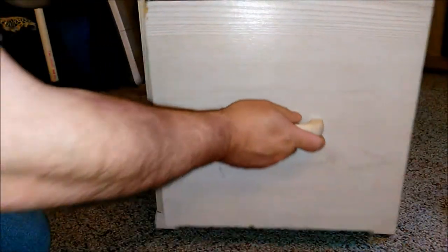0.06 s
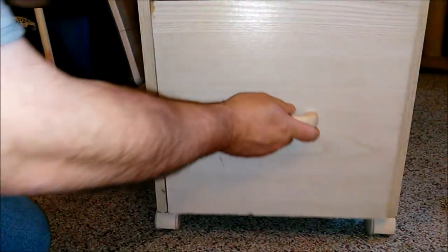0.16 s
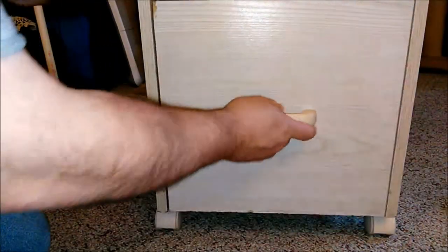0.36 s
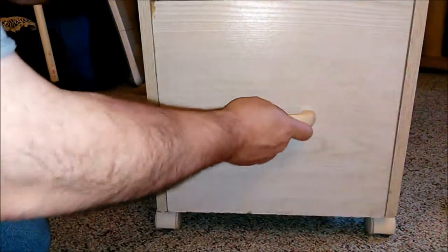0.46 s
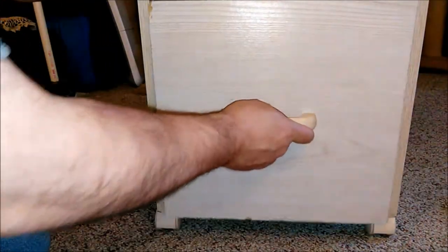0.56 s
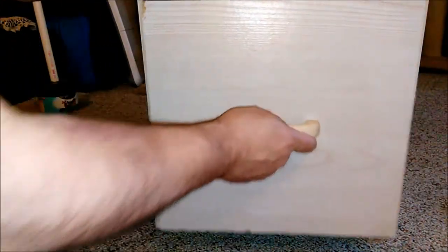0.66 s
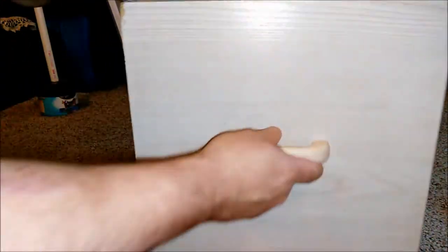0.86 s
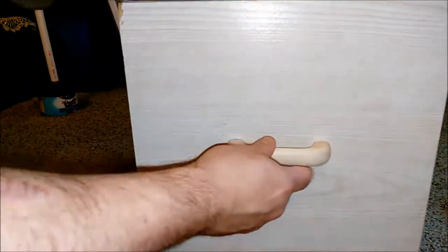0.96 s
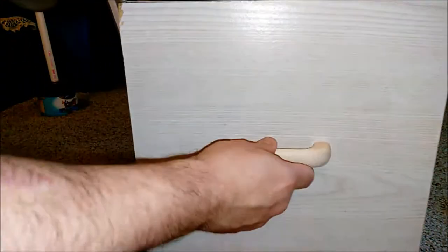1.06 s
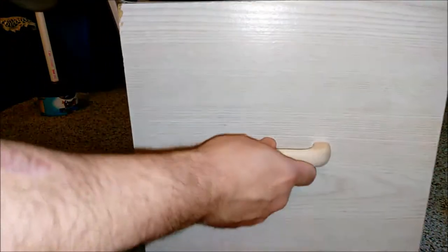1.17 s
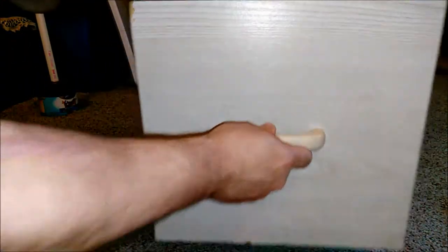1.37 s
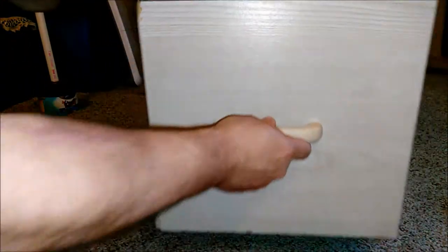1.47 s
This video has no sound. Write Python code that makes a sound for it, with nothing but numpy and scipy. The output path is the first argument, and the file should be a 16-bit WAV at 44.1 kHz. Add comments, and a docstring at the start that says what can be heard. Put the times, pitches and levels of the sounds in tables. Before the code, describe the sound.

Close to the microphone in a carpeted room, a wooden drawer bangs shut and rattles against its cabinet. It then slides open with a light rumble and hollow knocks, rests briefly and begins to slide once more.

```python
"""In a carpeted room, close by, a chipboard drawer glides in and slams, rattling against its cabinet.
It is tugged free, rolls out with a soft hiss and hollow bumps, rests, then starts to move again.
Each impact excites damped modes: the hollow drawer and the cabinet boom, the panels clatter and crack.
Friction makes the runners hiss and the rollers chirp; the rollers rumble with the load they bear."""
import sys
import numpy as np
from scipy import signal
from scipy.fft import rfft, irfft, next_fast_len
from scipy.io import wavfile
from scipy.ndimage import map_coordinates

SR = 44100
rng = np.random.default_rng(int(sys.argv[2]) if len(sys.argv) > 2 else 0)


def transcribe(u):
    """Save the signal u as a 16-bit wav file named by the first command-line argument.

    u: samples, shape (n,) or (channels, n), limited to [-1, 1]; the rate is SR.
    q: integer samples, one column per channel.
    """
    v = np.clip(np.atleast_2d(u).T, -1, 1)
    q = np.round(v * 32767).astype(np.int16)
    wavfile.write(sys.argv[1], SR, q)


N = 66150

# impacts of the drawer on its cabinet: start_s, boom_hz, boom_db, boom_t60_s, panel_db, crack_db
IMPACTS = [(0.072, 138.2, -22.5, 0.14, -44, -42), (.203, 220, -23, 0.022, -15, -29.5),
           (0.212, 159.5, -3.5, 0.11, -42.5, -27), (0.2415, 179.9, -9.5, 0.24, -15, -49),
           (.269, 175, -29, 0.034, -18.5, -53), (.281, 151.6, -5.5, 0.11, -38.5, -48),
           (.355, 170, -43.5, 0.068, -66, -60.5), (0.402, 147, -52, 0.053, -55.5, -60),
           (0.45, 148, -39, 0.13, -55, -80), (0.509, 155.9, -13, 0.16, -47, -63.5),
           (0.534, 171, -17, 0.094, -64, -80), (0.733, 178, -38, 0.084, -67, -80),
           (.865, 189, -19, 0.065, -57.5, -61), (1.041, 181.8, -31, 0.11, -62.5, -77),
           (1.100, 170, -42.5, 0.16, -73, -74.5), (1.257, 198, -25.5, 0.051, -58, -86.5),
           (1.312, 161.7, -28, 0.077, -68.5, -105.5), (1.373, 179.6, -33, 0.079, -61, -64.5)]
CRACK_RISE_S = 0.0007  # onset of cracks, ticks and grit


def amp(db):
    """Amplitude ratio of a level in decibels."""
    return 10 ** (np.asarray(db) / 20)


def unit(x):
    """Normalisation to an rms of 1."""
    return x / np.sqrt(np.mean(x ** 2) + 1e-20)


def along(points, hz):
    """Interpolation of (frequency, value) points on a logarithmic frequency axis."""
    frequencies, values = np.transpose(points)
    return np.interp(np.log(hz + 1), np.log(frequencies + 1), values)


def since(start_s):
    """Time elapsed from an onset in seconds, zero before it."""
    return np.maximum(np.arange(N) / SR - start_s, 0)


def struck(t, rise_s, t60_s):
    """Envelope of a damped vibration: a rounded rise and an exponential decay."""
    return (1 - np.exp(-(t / rise_s) ** 2)) * np.exp(-np.log(1000) * t / t60_s)


def mode(t, hz, rise_s, t60_s):
    """Free vibration of one mode: a damped sinusoid."""
    return struck(t, rise_s, t60_s) * np.sin(2 * np.pi * hz * t)


def add(track, start_s, sound):
    """Superposition of a sound on a track from a given onset."""
    part = track[..., round(start_s * SR):][..., :sound.shape[-1]]
    part += sound[..., :part.shape[-1]]


def filtered(x, response):
    """Linear filtering: the spectrum is multiplied by a frequency response."""
    size = next_fast_len(N + SR // 4)
    return irfft(rfft(x, size) * response(np.fft.rfftfreq(size, 1 / SR)), size)[..., :N]


def stereo_angle(hz):
    """Coherence as a mid-side angle in radians: the channels agree in the bass and part in the treble."""
    # likeness of left and right: frequency_hz, correlation
    coherence = [(100, 1), (250, .95), (500, .8), (1000, 0.44), (2000, -.1), (12000, 0)]
    return np.arccos(np.clip(along(coherence, hz), -1, 1)) / 2


def noise(spectrum):
    """Partially coherent stereo noise of rms 1, coloured by a spectrum."""
    def response(hz):
        angle = stereo_angle(hz)
        return amp(along(spectrum, hz)) * [np.cos(angle), np.sin(angle)]
    mid, side = filtered(rng.standard_normal((2, N)), response)
    return unit(np.array([mid + side, mid - side]))


def bursts(spectrum, events, rise_s, t60_s):
    """Incoherent addition: decaying noise bursts, one per (start_s, level_db), sum in power."""
    power = sum((amp(db) * struck(since(start_s), rise_s, t60_s)) ** 2 for start_s, db in events)
    return noise(spectrum) * np.sqrt(power)


def background():
    """Stationary noise, faint and strongest in the deep bass."""
    # background spectrum: frequency_hz, relative_density_db
    floor_spectrum = [(25, 15), (130, 0), (300, -7.5), (900, -14.5), (2000, -34), (9000, -17.5),
                      (15000, -22.5)]
    return amp(-67) * noise(floor_spectrum)


def reverberation(x, delay_s=0.012):
    """Convolution with the room's short impulse response, in which each band decays at its own rate."""
    # reverberation time: frequency_hz, t60_s
    decay_times = [(100, 0.24), (300, 0.36), (1000, 0.13), (3000, .3), (10000, 0.13)]
    white = noise([(100, 0), (10000, 0)])[:, :SR // 2]
    hz, t, bands = signal.stft(white, SR, nperseg=256)
    decay = amp(-60 * t / along(decay_times, hz)[:, None])
    _, tail = signal.istft(bands * decay, SR, nperseg=256)
    tail = np.pad(tail / np.linalg.norm(tail[0]), ((0, 0), (round(delay_s * SR), 0)))
    return signal.fftconvolve(x, tail, axes=1)[:, :N]


def roller_chirps(waver_hz=6, knots_per_s=150):
    """Friction-excited vibration: a rubbing roller sings briefly on an unsteady note."""
    # chirps of the rollers: start_s, pitch_hz, level_db, length_s
    chirp_events = [(0.072, 1365, -44, 0.022), (0.057, 1602, -48.5, 0.05), (0.067, 1050, -47, .026),
                    (0.74, 745, -49.5, 0.029), (0.998, 795, -52, 0.016), (1.242, 827, -65, 0.021),
                    (1.34, 1005, -60.5, .06), (1.357, 549, -63, 0.055)]
    out, position = np.zeros(N), np.arange(N) * knots_per_s / SR
    for start_s, hz, db, length_s in chirp_events:
        waver = map_coordinates(rng.standard_normal(2048), [position], mode="wrap")
        phase = 2 * np.pi * np.cumsum(hz + waver_hz * waver) / SR
        envelope = np.sin(np.pi * np.minimum(since(start_s) / length_s, 1)) ** 2
        out += amp(db) * envelope * np.sin(phase)
    return out


def runners(specks_per_s=120, speck_spread_db=3.5, grit_db=-10):
    """Sliding and rolling contact: gritty hiss follows speed, rumble follows load; the runners tick."""
    # the drawer's speed, as the level of its hiss: time_s, level_db
    speed_curve = [(0, -55.5), (0.069, -51), (.12, -52), (.185, -52.5), (.25, -54.5), (0.421, -77.5),
                   (0.499, -78), (.56, -64.5), (.66, -60.5), (.76, -53), (.85, -55.5), (.93, -65.5),
                   (1.04, -67), (1.14, -78), (1.27, -79.5), (1.341, -68.5), (1.419, -57.5), (1.5, -56)]
    # load on the rollers, as the level of their rumble: time_s, level_db
    load_curve = [(0, -55), (0.056, -44), (0.128, -41), (.19, -56.5), (0.451, -60), (.6, -63), (.7, -49),
                  (0.791, -42.5), (.85, -52), (.93, -47.5), (1.02, -53.5), (1.12, -57), (1.2, -83),
                  (1.27, -62), (1.36, -57), (1.5, -61.5)]
    # rubbing of the runners: frequency_hz, relative_density_db
    hiss_spectrum = [(200, -10), (550, -13.5), (780, 3.5), (900, 2.5), (1050, 10), (1300, -2), (1650, 1.5),
                     (2200, 4), (3000, 3), (3900, -4), (5200, -9.5), (7400, -2), (11000, -10.5),
                     (15000, -21.5)]
    # rumble of the rollers: frequency_hz, relative_density_db
    rumble_spectrum = [(30, -31), (65, -23.5), (100, -18), (130, 2.5), (170, 6.5), (215, 1), (280, -18),
                       (450, -30), (1000, -64)]
    # small ticks of the runners: start_s, level_db
    tick_events = [(0.062, -48.5), (.071, -49), (0.142, -48.5), (0.342, -65), (0.698, -51), (.877, -54),
                   (0.951, -52.5), (0.978, -60)]
    # colour of a tick: frequency_hz, relative_density_db
    tick_spectrum = [(1000, -39.5), (2800, 4.5), (4800, -9.5), (7000, 4.5), (10000, -7.5), (15000, -19.5)]
    t = since(0)
    hiss_db = np.interp(t, *np.transpose(speed_curve))
    rumble_db = np.interp(t, *np.transpose(load_curve))
    # specks under the rollers roughen the hiss
    specks = (rng.random(N) < specks_per_s / SR) * amp(speck_spread_db * rng.standard_normal(N))
    grit = unit(signal.fftconvolve(specks, struck(t, CRACK_RISE_S, t60_s=0.012))[:N])
    hiss = noise(hiss_spectrum) * amp(hiss_db) * np.sqrt(1 + (amp(grit_db) * grit) ** 2)
    rumble = noise(rumble_spectrum) * amp(rumble_db)
    return hiss + rumble + bursts(tick_spectrum, tick_events, CRACK_RISE_S, t60_s=0.094)


def cabinet_rocking():
    """Damped low-frequency vibration: the cabinet rocks on its castors."""
    # jolts of the cabinet: start_s, level_db
    jolts = [(.215, -60), (.31, -40.5), (.515, -52), (.87, -73), (1.26, -59), (1.32, -55.5)]
    # colour of the rocking: frequency_hz, relative_density_db
    rocking_spectrum = [(15, -48), (30, -23), (50, -2), (68, -1), (100, -4), (200, -31), (500, -82)]
    return bursts(rocking_spectrum, jolts, rise_s=0.012, t60_s=0.38)


def booms(rise_s=0.0077):
    """Resonance: each impact sounds the hollow of the drawer and the cabinet's low modes."""
    # low modes of the cabinet: pitch_hz, level_re_boom_db, t60_s
    cabinet_modes = [(90, -42, 0.9), (110.5, -13.5, 0.17), (158.1, -37, 0.29), (198, -26, 0.18),
                     (224.5, -22.5, 0.3), (271.6, -28.5, 0.18)]
    out, t = np.zeros((2, N)), np.arange(SR // 2) / SR
    cabinet = sum(amp(db) * mode(t, hz, rise_s, t60_s) for hz, db, t60_s in cabinet_modes)
    for start_s, hz, db, t60_s, _, _ in IMPACTS:
        add(out, start_s, amp(db) * (cabinet + mode(t, hz, rise_s, t60_s)))
    return out


def panel_knocks(rise_s=0.0016, ring_db=-8, scatter_db=3.5, clatter_db=-2):
    """Impact excitation: each blow rings the panels' modes, with a dense clatter and a short crack."""
    # modes of the panels: pitch_hz, relative_level_db, t60_s
    panel_modes = [(331, -11, .15), (379, -5, .15), (561, -5, .18), (705, -10, .16), (769, -12, .17),
                   (829, -14, .16), (869, -10, .16), (1013, -9, .17), (1090, -13, .13), (1155, -11, .14),
                   (1365, -21, .15), (1492, -18, .15), (1540, -22, .15), (1717, -26, .16)]
    # broad resonances of the wood: frequency_hz, relative_density_db
    clatter_spectrum = [(120, -28.5), (240, 19.5), (310, 5.5), (390, -5), (490, 4), (680, 2), (920, -1),
                        (1050, 2.5), (1300, -9), (1540, -9), (1850, -12), (2700, -22.5), (4000, -32.5),
                        (9000, -52)]
    # colour of the crack: frequency_hz, relative_density_db
    crack_spectrum = [(500, -15), (1500, 9.5), (2800, 4.5), (4000, -5), (5600, -1.5), (7500, -9),
                      (11000, -12.5), (15000, -25.5)]
    ring, t = np.zeros((2, N)), np.arange(SR // 3) / SR
    modes = np.array([(-1) ** k * amp(db) * struck(t, rise_s, t60_s) * np.exp(2j * np.pi * hz * t)
                      for k, (hz, db, t60_s) in enumerate(panel_modes)])
    width = stereo_angle(np.array(panel_modes)[:, 0])
    for start_s, *_, panel_db, _ in IMPACTS:
        # each blow gives each mode a random strength and left-right phase offset
        strength, skew = rng.standard_normal((2, len(panel_modes)))
        weights = amp(scatter_db * strength) * np.exp(1j * width * np.array([skew, -skew]))
        add(ring, start_s, amp(panel_db + ring_db) * (weights @ modes).imag)
    clatters = [(start_s, panel_db + clatter_db) for start_s, *_, panel_db, _ in IMPACTS]
    cracks = [(start_s, crack_db) for start_s, *_, crack_db in IMPACTS]
    clatter = bursts(clatter_spectrum, clatters, rise_s, t60_s=0.15)
    return ring + clatter + bursts(crack_spectrum, cracks, CRACK_RISE_S, t60_s=0.082)


def drawer_front(rise_s=0.003):
    """Modal ringing: the front knocks hollowly on the frame as it shuts and as it is tugged free."""
    # modes of the drawer front: pitch_hz, level_db, t60_s
    front_modes = [(389.1, -11, 0.072), (689.6, -5.5, 0.028), (992, -15.5, 0.037), (1106, -28.5, 0.054),
                   (1552, -26.5, 0.073)]
    # the slam and the tug: start_s, gain_db
    front_hits = [(0.2033, 1), (.509, -34)]
    out = np.zeros(N)
    for start_s, gain_db in front_hits:
        for k, (hz, db, t60_s) in enumerate(front_modes):
            out += (-1) ** k * amp(gain_db + db) * mode(since(start_s), hz, rise_s, t60_s)
    return out


def scene():
    """Direct and reverberant sound add; a level difference sets the drawer slightly to the left."""
    # boost on the left and equal cut on the right: frequency_hz, gain_db
    left_bias = [(100, .3), (160, .45), (280, .1), (550, 1.3), (1100, 1.1), (2000, 1.2), (4000, .4),
                 (12000, 1.2)]
    bass = booms() + cabinet_rocking()
    wood = panel_knocks() + drawer_front() + roller_chirps()
    direct = bass + wood + runners()
    drawer = direct + reverberation(amp(-18.5) * bass + amp(-18) * wood)
    placed = filtered(drawer, lambda hz: amp(along(left_bias, hz) * np.array([[1], [-1]])))
    return placed + background()


def record(dry):
    """Band limiting: a third-order roll-off in the deepest bass and a sharp cut in the top treble."""
    low_cut_hz, top_hz = 42, 15600
    return filtered(dry, lambda hz: (hz < top_hz) * (hz / np.hypot(hz, low_cut_hz)) ** 3)


dry = scene()
out = record(dry)
transcribe(out)
```